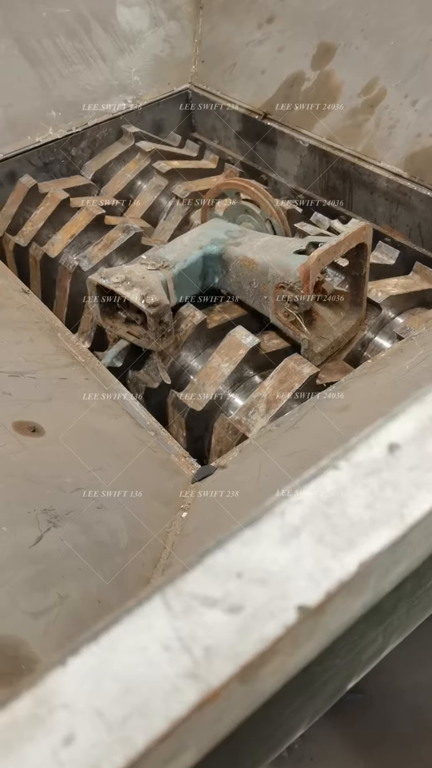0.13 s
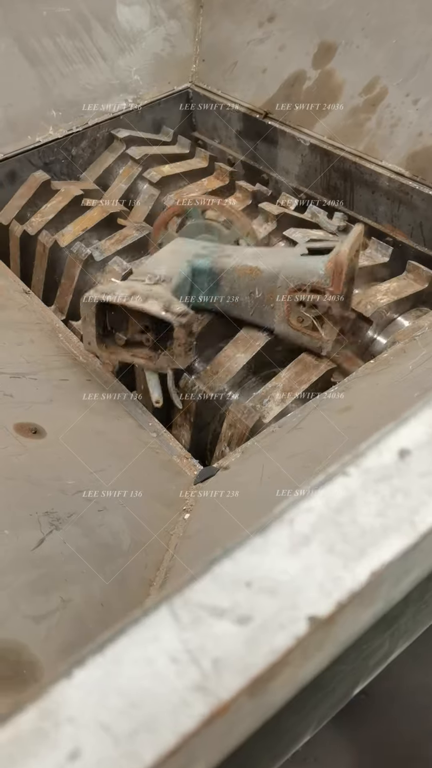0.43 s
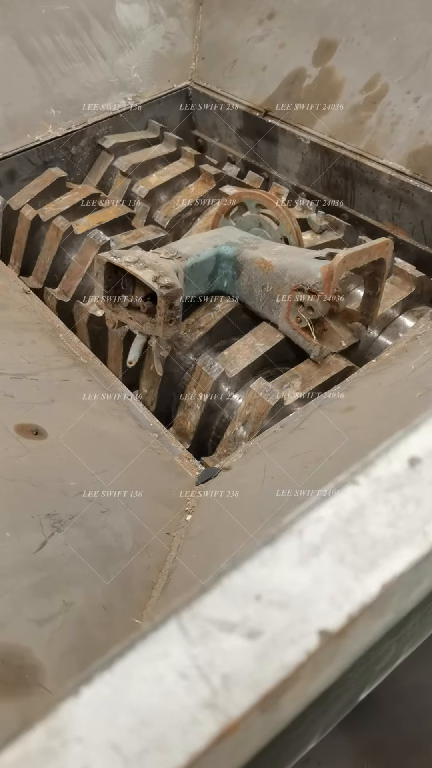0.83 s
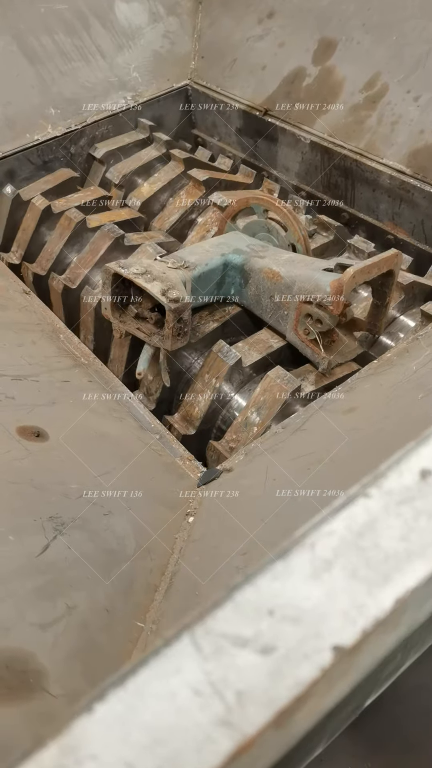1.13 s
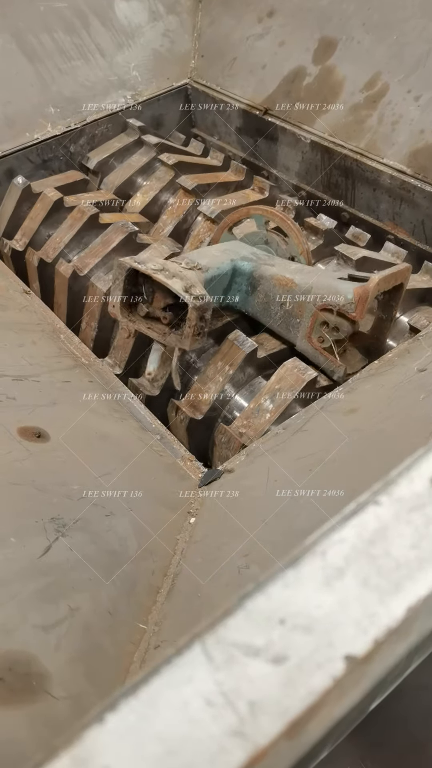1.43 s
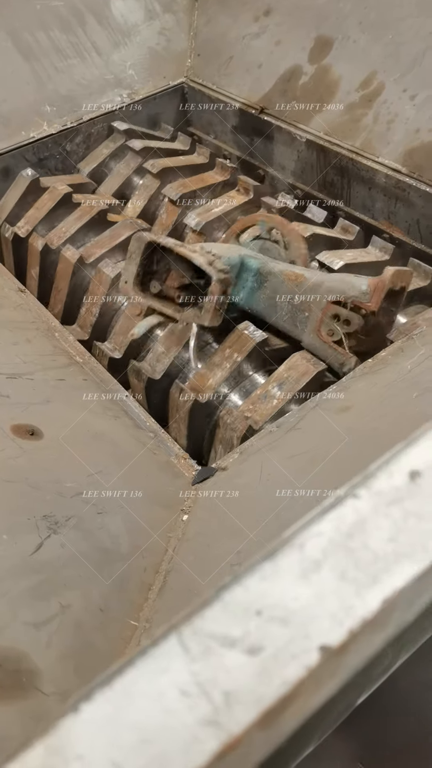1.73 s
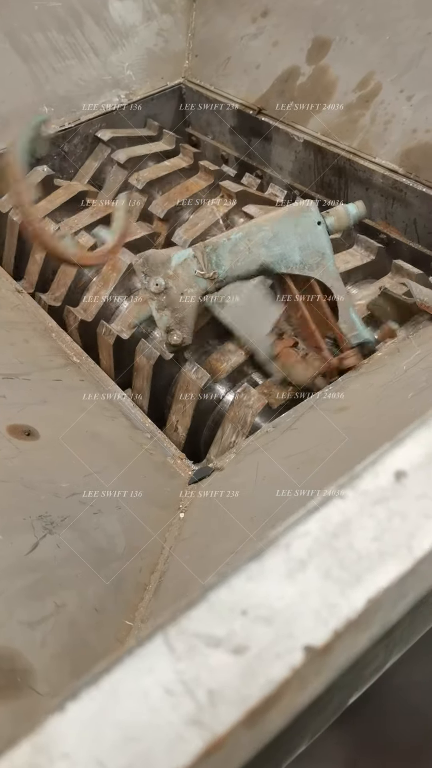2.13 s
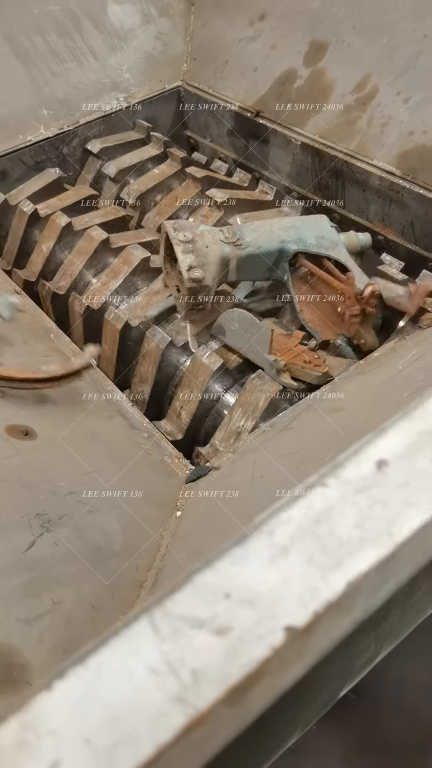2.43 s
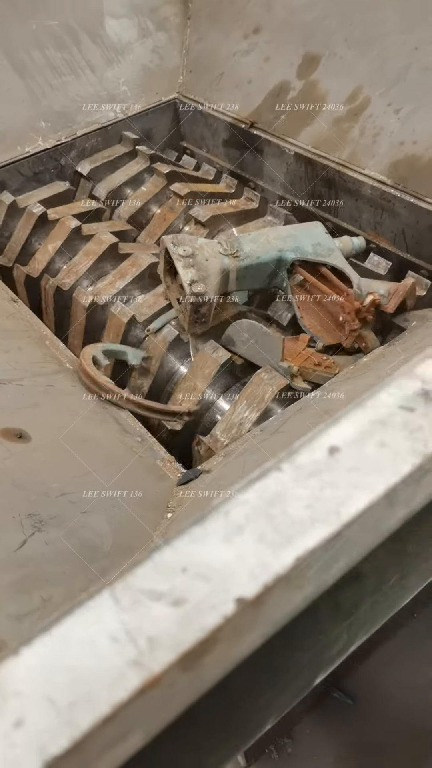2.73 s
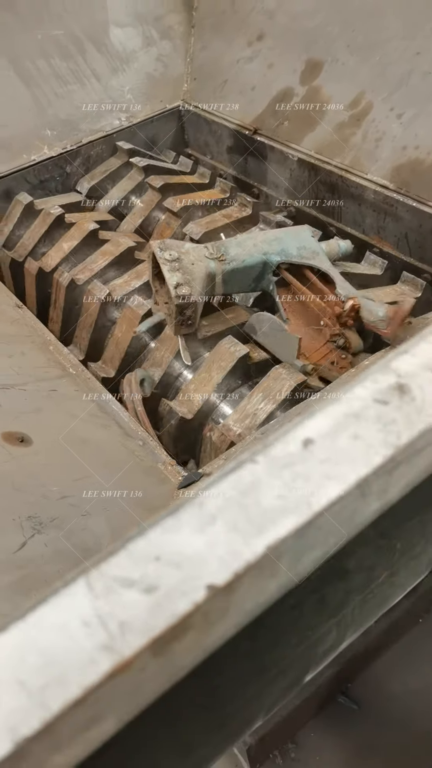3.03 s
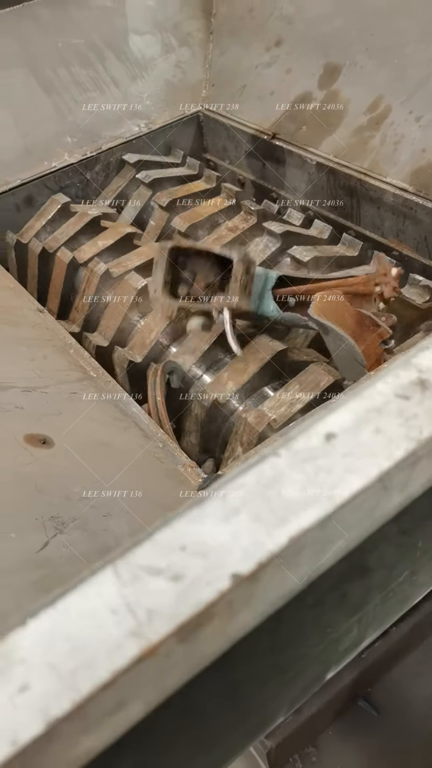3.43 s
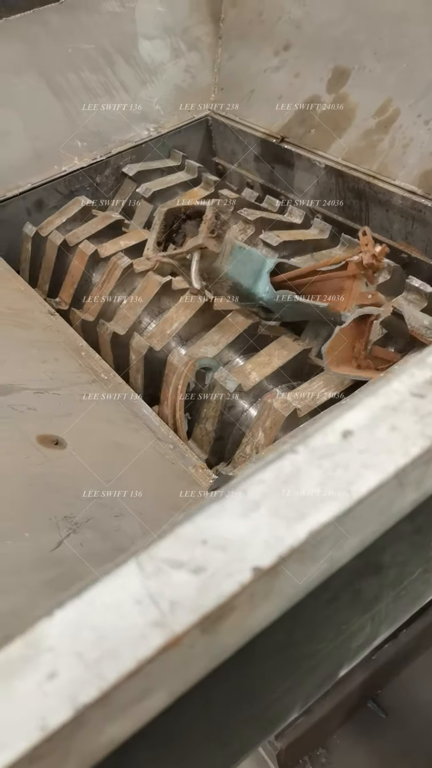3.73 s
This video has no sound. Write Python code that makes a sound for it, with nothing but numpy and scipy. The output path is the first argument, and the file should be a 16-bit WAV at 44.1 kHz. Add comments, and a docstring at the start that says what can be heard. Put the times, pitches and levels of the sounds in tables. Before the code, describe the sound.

A double-shaft shredder bites a metal casting: a fading ring, then a booming crunch, a quieter spell with thin squeals, then harsher grinding, cracks and bangs, heard close in stereo from the rim of a steel hopper.

```python
"""Double-shaft shredder biting a metal casting

Heard from the rim of the steel hopper. Noise grains under load curves, through filters, make the frame rumble,
crunch and grinding; noise bursts make jolts, cracks and bangs. Gliding stick-slip tones make squeals;
wavering tones make screeches, and slowly rising ones groans. Decaying sines make chips and a loose piece
ring. Filtered noise is the motor drone.
"""
import sys
import numpy as np
from scipy import signal
from scipy.fft import rfft, irfft, next_fast_len
from scipy.io import wavfile
from scipy.ndimage import uniform_filter1d, map_coordinates

SR = 44100
rng = np.random.default_rng(int(sys.argv[2]) if len(sys.argv) > 2 else 0)


def unload_audio(sound):
    """Save the sound as a 16-bit wav file, at the path given as the first command line argument."""
    columns = np.transpose(np.atleast_2d(sound))
    # keep every value between -1 and 1, then stretch to whole-number steps
    steps = np.round(np.clip(columns, -1, 1) * 32767)
    wavfile.write(sys.argv[1], SR, steps.astype(np.int16))


N = 171990

# Load on the cutters. Each row: time in seconds, then frame rumble, low crunch, mid crunch and
# grinding of fragments, levels in dB before each layer's trim.
LOAD_CURVES = [(0,-38.5,-41,-40,-38.5),(.14,-34,-63,-46,-55.5),(.25,-31.5,-33.5,-42.5,-44),(.31,-14.5,-21.5,-26.5,-26.5),(.42,-16,-20.5,-23,-28.5),(.6,-18.5,-27,-33,-32.5),(.8,-21.5,-35.5,-36.5,-40.5),(1.08,-26,-31.5,-40,-40),(1.22,-19.5,-31.5,-38.5,-34.5),(1.45,-18.5,-27.5,-33.5,-28),(1.6,-20,-29,-30.5,-28),(1.68,-13,-18,-25.5,-20.5),(1.95,-13.5,-23,-24,-20.5),(2.2,-15,-23,-25,-21),(2.26,-15.5,-22.5,-24.5,-15),(2.52,-17,-29,-26.5,-22),(2.69,-19.5,-31.5,-30.5,-32),(2.8,-23,-38,-36.5,-38),(3.07,-25,-34,-40,-28.5),(3.12,-18,-19.5,-26.5,-25.5),(3.25,-21,-24.5,-30,-26),(3.5,-15,-23,-25.5,-26),(3.72,-19,-38,-33,-34),(3.9,-26,-30,-36.5,-39)]
# Fractures of the casting. Each row: start in seconds, level in dB before trim, t60 in seconds,
# drive of the casting's ring in dB re the snap, before trim.
CASTING_CRACKS = [(0.204,-36,0.033,-14),(0.25,-19.5,0.064,-22),(0.2576,-24.5,0.046,13),(0.3055,-25,0.068,4),(0.361,-38.5,0.11,16.5),(0.668,-27.5,0.027,-15),(1.0135,-23,0.045,-23),(1.521,-22,0.037,2),(1.547,-16,0.038,-10),(1.632,-12,0.027,-4),(1.877,-22,0.03,-2),(1.928,-16,0.038,-1),(2.251,-24,0.055,1),(2.464,-20,0.15,-15),(3.0,-16.5,0.033,-23),(3.058,-19.5,0.017,-25),(3.088,-15.5,0.083,-15),(3.094,-17,0.049,-8)]
# Pieces hitting the hopper. Each row: start in seconds, level in dB before trim.
HOPPER_BANGS = [(0.386,-22.5),(0.43,-20),(0.668,-20.5),(1.547,-16.5),(1.638,-20.5),(3.091,-18)]
# Jolts of the frame. Each row: start in seconds, level in dB.
FRAME_JOLTS = [(0.313,-10),(1.273,-12),(3.108,-9),(3.279,-8),(3.395,-8.5)]
# Judder of the wedged casting. Each row: start in seconds, length in seconds, level in dB.
GROAN_STROKES = [(1.205,0.1,-22.5),(1.367,0.16,-16),(1.568,0.095,-17),(1.84,0.21,-15.5),(3.109,.055,-18),(3.543,0.11,-17.5)]
# Rubs on a disc. Each row: start in seconds, length in seconds, start pitch in Hz, glide in Hz, level in dB.
SQUEAL_STROKES = [(.56,.32,4760,60,-44),(.715,.1,4800,50,-37),(.84,.06,4780,-140,-37),(.88,.15,4635,-20,-29),(1.026,.025,4500,0,-34),(1.045,.09,4600,30,-36),(1.13,.135,4625,-20,-35),(1.255,.125,4550,90,-31.5),(1.372,.06,4520,-50,-34),(1.465,.07,4860,0,-31),(2.875,.115,5050,0,-36),(3.17,.21,4920,130,-39),(3.42,.25,4930,130,-39),(3.68,.12,4830,100,-41),(3.775,.1,4940,-70,-39)]
# Harmonics of a squeal. Each entry: level in dB, fundamental first.
SQUEAL_HARMONICS_DB = [0,-14,-17]
# Rough screeches of trapped edges and of the rubbed, ringing casting. Each row: start in seconds,
# length in seconds, mean pitch in Hz, level in dB before trim.
METAL_SCREECHES = [(1.215,.04,3650,-37),(1.28,.08,3644,-37),(1.236,.06,6000,-44),(1.423,.18,6920,-42),(1.65,.07,2350,-34),(2.57,.13,6920,-37),(2.5,.23,2030,-43),(2.838,.028,7000,-37),(3.872,.04,5520,-45)]
# Ring of a loose steel piece. Each row: frequency in Hz, level at the start in dB, t60 in seconds.
LOOSE_PIECE_MODES = [(1230,-40,0.92),(2350,-39,0.94),(2630,-35,0.45),(3461,-38,0.42)]
# Resonances of frame and casting. Each row: centre in Hz, width in Hz, relative gain in dB.
FRAME_MODES = [(50.4,7.5,-6),(90,23,-3),(119.4,10,1),(146.3,12.3,4.5),(187.6,37,0),(222.3,53,-1.5),(268.3,8.7,0.5)]
CASTING_MODES = [(2020,110,5),(2206,115,6.5),(2700,780,-5),(4220,140,-3.5)]
# Spectra of the layers. Each row: frequency in Hz, relative gain in dB.
FRAME_SPECTRUM = [(15,-64),(30,-15),(48,3),(65,-2.5),(100,0),(140,0),(250,-0.5),(330,-11.5),(500,-28),(1200,-101)]
LOW_CRUNCH_SPECTRUM = [(120,-60),(250,-5),(320,-1),(400,-4),(470,-6),(600,-15.5),(1000,-27.5),(3000,-83)]
MID_CRUNCH_SPECTRUM = [(300,-40),(540,-3),(660,1.5),(880,5.5),(1400,-2),(2100,-4),(3000,-9),(4300,-7),(6000,-23),(10000,-40),(16000,-68)]
FRAGMENT_SPECTRUM = [(800,-31),(2200,-2.5),(3400,-7.5),(5200,-6.5),(6300,-3),(7000,1),(7700,0.5),(8300,-11.5),(9200,-11),(10200,-6),(12000,-13),(15000,-15.5),(16000,-26)]
SNAP_SPECTRUM = [(400,-35),(1800,-1.5),(4200,5.5),(7200,2.5),(8700,0),(10200,4),(13000,-5),(16000,-17)]
HOPPER_SPECTRUM = [(40,-8),(200,5.5),(500,-10),(900,0),(1500,-12),(2100,-5.5),(3500,-18.5),(9000,-52)]
MOTOR_SPECTRUM = [(20,-34),(60,-14),(140,1.5),(370,-8),(600,-24.5),(3000,-26),(8000,-45),(16000,-65)]
# Stereo likeness of spread layers. Each row: frequency in Hz, left-right correlation (no unit).
STEREO_LIKENESS = [(140,0.97),(250,0.94),(500,0.53),(1000,0.013),(2000,-0.18)]
# Colour of two microphone ports. Each row: frequency in Hz, left minus right in dB.
PORT_DIFFERENCE = [(140,1),(330,-2.5),(700,2),(2000,-3),(5000,2),(7100,-9.5),(8400,-2.5),(9300,6.5),(10200,8.5),(10900,2.5),(12200,8.5),(14000,6),(15500,-12)]

MOTOR_DB, SPLINTER_DB, CLINK_DB, SCREECH_OVERTONE_DB = -32, -14, -6, -19.5
SLIPS_PER_S, SCREECH_JITTER_HZ = 30, 45.7
GROAN_HZ, GROAN_RISE_HZ_PER_S = 128.1, 138
TOP_HZ = 15800


def amp(db):
    """Decibels to gain."""
    return 10 ** (np.asarray(db) / 20)


def unit(x):
    """Scale to rms 1."""
    return x / np.sqrt(np.mean(x ** 2) + 1e-20)


def along(points, hz):
    """Interpolate (Hz, value) points on a log frequency axis."""
    point_hz, value = np.transpose(points)
    return np.interp(np.log(hz + 1), np.log(point_hz + 1), value)


def clock():
    """Time of each sample in seconds."""
    return np.arange(N) / SR


def curves(rows):
    """One value per sample for each column after the time."""
    time_s, *columns = np.transpose(rows)
    return [np.interp(clock(), time_s, column) for column in columns]


def wobble(knots_per_s):
    """Smooth random curve through Gaussian knots."""
    return map_coordinates(rng.standard_normal(8192), [clock() * knots_per_s], mode="wrap")


def decay(t_s, t60_s):
    """Exponential fall of 60 dB per t60."""
    return np.exp(-np.log(1000) * t_s / t60_s)


def swell(start_s, length_s):
    """Rounded rise and fall of one rub."""
    progress = np.clip((clock() - start_s) / length_s, 0, 1)
    return np.sqrt(np.abs(np.sin(np.pi * progress)))


def filtered(x, response):
    """Apply a complex frequency response, zero-padded."""
    size = 2 * next_fast_len(N)
    return irfft(rfft(x, size) * response(np.fft.rfftfreq(size, 1 / SR)), size)[..., :N]


def coloured(x, gain):
    """Causal minimum-phase filter of unit power with this gain."""
    def response(hz):
        cepstrum = irfft(np.log(np.maximum(unit(gain(hz)), 1e-6)))
        middle = len(cepstrum) // 2
        # fold the cepstrum onto positive time
        cepstrum[1:middle] *= 2
        cepstrum[middle + 1:] = 0
        return np.exp(rfft(cepstrum))
    return filtered(x, response)


def shape(points):
    """Gain function of a spectrum."""
    return lambda hz: amp(along(points, hz))


def modes(rows):
    """Gain function of resonances whose powers add."""
    def gain(hz):
        power = 0
        for centre_hz, width_hz, db in rows:
            damping = (hz * width_hz) ** 2
            power = power + amp(db) ** 2 * damping / ((centre_hz ** 2 - hz * hz) ** 2 + damping)
        return np.sqrt(power)
    return gain


def frame_body(hz):
    """Gain of the frame: its resonances times its overall spectrum."""
    return modes(FRAME_MODES)(hz) * shape(FRAME_SPECTRUM)(hz)


def spread(pair):
    """Mix two unrelated signals into a stereo pair, alike in the bass."""
    def mid_side(hz):
        angle = np.arccos(np.clip(along(STEREO_LIKENESS, hz), -1, 1)) / 2
        return np.array([np.cos(angle), np.sin(angle)])
    mid, side = filtered(pair, mid_side)
    return np.array([mid + side, mid - side])


def grains(rate_per_s, life_s, scatter_db, bed):
    """Random micro-fractures, each a short noise burst, on a bed of friction noise."""
    hits = (rng.random(N) < rate_per_s / SR) * amp(scatter_db * rng.random(N))
    power = signal.lfilter([1], [1, -np.exp(-2 / (life_s * SR))], hits ** 2)
    envelope = np.sqrt(power / power.mean() + bed)
    return unit(envelope * rng.standard_normal((2, N)))


def burst(start_s, t60_s, attack_s):
    """A noisy blow that rises fast and dies away."""
    t_s = np.maximum(clock() - start_s, 0)
    rise = 1 - np.exp(-t_s / attack_s)
    return rise * decay(np.minimum(t_s, 10 * t60_s), t60_s) * rng.standard_normal((2, N))


def steadied(x, window_s, share):
    """Even out a share of the slow chance swings of a noise."""
    power = np.abs(uniform_filter1d(np.mean(x ** 2, axis=0), max(2, int(window_s * SR))))
    return unit(x / (power + 1e-9) ** (share / 2))


def tone(hz, jitter, rough_db):
    """Stick-slip vibration: phase with a pitch jump at each slip, and stuttering strength."""
    slip = np.cumsum(rng.random(N) < SLIPS_PER_S / SR)
    jump = rng.standard_normal(N)[slip]
    phase = 2 * np.pi * np.cumsum(hz * (1 + jitter * (wobble(300) + jump / 2))) / SR
    return phase, np.sqrt(2) * unit(amp(rough_db * wobble(140)))


def hopper(x, t60_s, wet_db):
    """The steel walls add a short, dense ring, different at each port."""
    t_s = np.arange(SR // 3) / SR
    tail = rng.standard_normal((2, len(t_s))) * decay(t_s, t60_s)
    tail *= amp(wet_db) / np.linalg.norm(tail, axis=1, keepdims=True)
    wet = signal.fftconvolve(x, tail, axes=1)[:, :N]
    return (x + wet) / np.sqrt(1 + amp(wet_db) ** 2)


def motor():
    """Steady drone of the drive: noise of fixed spectrum."""
    return amp(MOTOR_DB) * spread(coloured(rng.standard_normal((2, N)), shape(MOTOR_SPECTRUM)))


def loose_piece():
    """A struck piece fades from the start: decaying modes with unsteady phase."""
    t_s = clock()
    ring = np.zeros(N)
    for hz, db, t60_s in LOOSE_PIECE_MODES:
        ring += amp(db - 60 * t_s / t60_s) * np.sin(2 * np.pi * hz * t_s + 1.5 * wobble(200))
    return hopper(np.array([ring, ring]), t60_s=.1, wet_db=-6)


def screeches():
    """Trapped edges and the rubbed, ringing casting screech roughly, each on an unsteady pitch."""
    out = np.zeros(N)
    for start_s, length_s, hz, db in METAL_SCREECHES:
        phase = 2 * np.pi * np.cumsum(hz + SCREECH_JITTER_HZ * wobble(350)) / SR
        overtones = np.sin(2 * phase) + np.sin(3 * phase)
        partials = np.sin(phase) + amp(SCREECH_OVERTONE_DB) * overtones
        roughness = unit(amp(2.2 * wobble(150)))
        out += amp(db + 9) * swell(start_s, length_s) * roughness * partials
    return hopper(np.array([out, out]), t60_s=.08, wet_db=-3)


def squeals():
    """Metal rubs on the side of a disc in strokes and sings; more grit makes the pitch waver more."""
    hz, strength = np.full(N, float(SQUEAL_STROKES[0][2])), np.zeros(N)
    for start_s, length_s, pitch_hz, glide_hz, db in SQUEAL_STROKES:
        progress = np.clip((clock() - start_s) / length_s, 0, 1)
        hz = np.where(clock() < start_s, hz, pitch_hz + glide_hz * progress)
        strength += amp(db) * swell(start_s, length_s)
    grit = np.sqrt(unit(amp(curves(LOAD_CURVES)[3])))
    phase, flutter = tone(hz, jitter=.012 * grit, rough_db=2.5)
    partials = sum(amp(db) * np.sin(k * phase) for k, db in enumerate(SQUEAL_HARMONICS_DB, 1))
    panned = strength * flutter * partials * amp([[1.5], [-1.5]])
    return hopper(panned, t60_s=.1, wet_db=-3)


def bangs():
    """Loose pieces hit the thick hopper walls: noise blows in the wall's spectrum."""
    blows = sum(amp(db) * burst(start_s, t60_s=0.11, attack_s=0.0011) for start_s, db in HOPPER_BANGS)
    return amp(6) * spread(coloured(blows, shape(HOPPER_SPECTRUM)))


def clinks():
    """Chips break off in clusters, and each rings briefly at its own pitch."""
    draws, t_s = rng.random(size=(700, 4)), np.arange(SR // 20) / SR
    odds = np.cumsum(amp(6 * wobble(22)))
    starts = np.searchsorted(odds, draws[:, 0] * odds[-1])
    out = np.zeros((2, N + len(t_s)))
    for start, (_, pitch, size, pan) in zip(starts, draws):
        hz = 560 * 4.4 ** pitch
        ring = amp(11.3 * size - 60 * t_s / 0.059) * np.sin(2 * np.pi * hz * t_s)
        # past pan 0.5 the left channel is inverted
        sides = [np.cos(np.pi * pan), np.sin(np.pi * pan)]
        out[:, start:start + len(t_s)] += np.outer(sides, ring)
    return amp(curves(LOAD_CURVES)[2] + CLINK_DB) * unit(out[:, :N])


def cracks():
    """Each fracture is a bright snap that rings the casting and echoes in the hopper."""
    snap, ring = np.zeros((2, 2, N))
    for start_s, db, t60_s, ring_db in CASTING_CRACKS:
        blow = amp(db) * burst(start_s, t60_s, attack_s=0.00061)
        snap += blow
        # swapped sides
        ring += amp(ring_db) * blow[::-1]
    snap = hopper(coloured(snap, shape(SNAP_SPECTRUM)), t60_s=0.11, wet_db=-5)
    ring = hopper(coloured(ring, modes(CASTING_MODES)), t60_s=0.17, wet_db=0)
    return amp(3.5) * snap + amp(5.5) * ring


def groans():
    """The wedged casting judders against the shafts, a little faster as the strain builds."""
    out = np.zeros(N)
    for start_s, length_s, db in GROAN_STROKES:
        hz = GROAN_HZ + GROAN_RISE_HZ_PER_S * np.clip(clock() - start_s, 0, length_s)
        phase = 2 * np.pi * np.cumsum(hz * (1 + 0.0494 * wobble(70))) / SR
        partials = np.sin(phase) + 0.2 * np.sin(2 * phase) + 0.14 * np.sin(3 * phase)
        out += amp(db) * swell(start_s, length_s) * np.sqrt(2) * partials
    return out


def grinding():
    """Fragments scrape along the discs, and splinters tick off them."""
    level_db = curves(LOAD_CURVES)[3] + 2.06 * wobble(24.65)
    scrape = grains(260, life_s=0.016, scatter_db=8.3, bed=1.03) * amp(level_db)
    splinters = grains(70, life_s=0.0014, scatter_db=12, bed=.02) * amp(level_db + SPLINTER_DB)
    scrape = coloured(hopper(scrape, t60_s=0.064, wet_db=-7.5), shape(FRAGMENT_SPECTRUM))
    return amp(1.1) * scrape + coloured(splinters, shape(SNAP_SPECTRUM))


def crunch():
    """The casting crumbles between the cutters; each break is both a knock and a crackle."""
    low_db, mid_db = curves(LOAD_CURVES)[1:3]
    breaks = hopper(grains(130, life_s=0.0069, scatter_db=7, bed=1), t60_s=0.11, wet_db=-7.5)
    low = coloured(breaks, shape(LOW_CRUNCH_SPECTRUM)) * amp(low_db + .5)
    mid = coloured(breaks, shape(MID_CRUNCH_SPECTRUM)) * amp(mid_db + 1.5)
    return spread(low + mid)


def frame():
    """Dense knocks of the cutters and a few heavy jolts boom in the frame's resonances."""
    knocks = coloured(grains(200, life_s=0.0031, scatter_db=0.98, bed=1.0), frame_body)
    rumble = steadied(spread(knocks), window_s=0.065, share=0.6)
    jolts = sum(amp(db) * burst(start_s, t60_s=0.2, attack_s=0.0025) for start_s, db in FRAME_JOLTS)
    return amp(curves(LOAD_CURVES)[0]) * rumble + spread(coloured(jolts, frame_body))


def scene():
    """Sum of all layers of the shredder."""
    background = motor() + loose_piece()
    metal = screeches() + squeals() + bangs() + clinks() + cracks()
    bite = groans() + grinding() + crunch() + frame()
    return background + metal + bite


def record(dry):
    """Each port has its own colour; peaks are rounded off and the top is cut."""
    half = np.array([[.5], [-.5]])
    x = filtered(dry, lambda hz: amp(along(PORT_DIFFERENCE, hz) * half))
    x = x / (1 + x ** 8) ** (1 / 8)
    return filtered(x, lambda hz: hz < TOP_HZ)


dry = scene()
out = record(dry)
unload_audio(out)
```